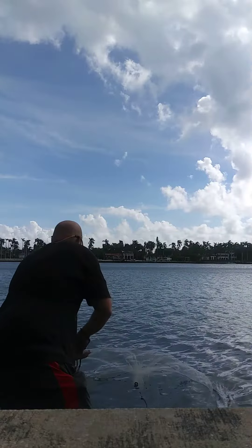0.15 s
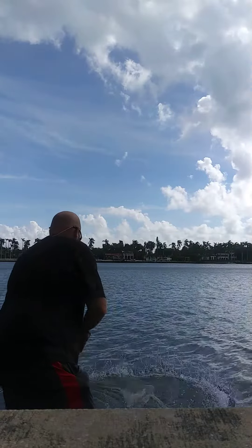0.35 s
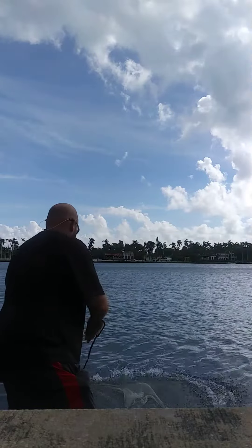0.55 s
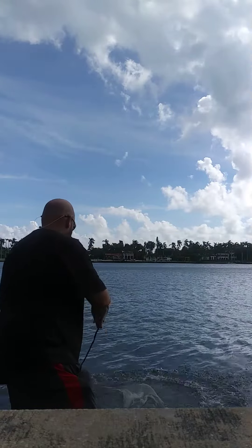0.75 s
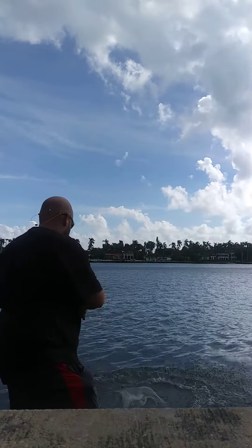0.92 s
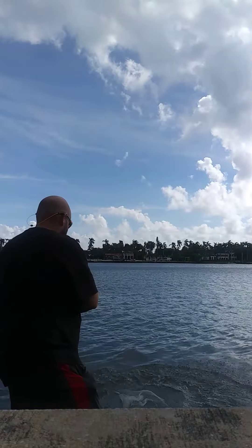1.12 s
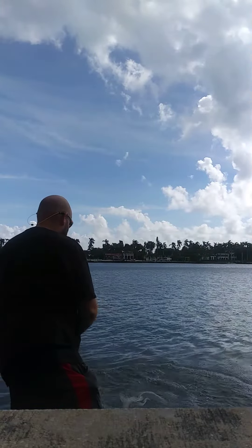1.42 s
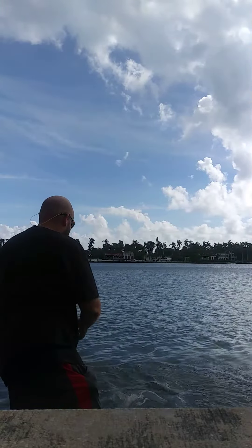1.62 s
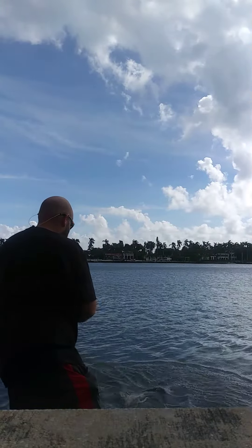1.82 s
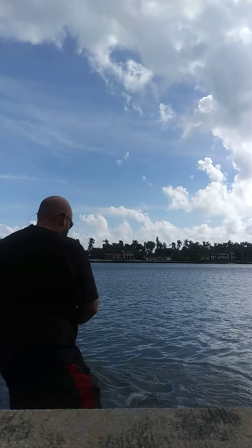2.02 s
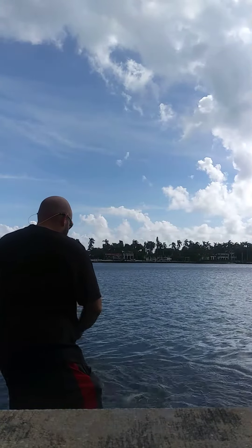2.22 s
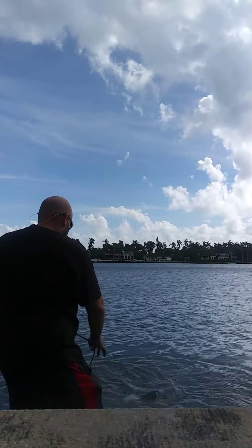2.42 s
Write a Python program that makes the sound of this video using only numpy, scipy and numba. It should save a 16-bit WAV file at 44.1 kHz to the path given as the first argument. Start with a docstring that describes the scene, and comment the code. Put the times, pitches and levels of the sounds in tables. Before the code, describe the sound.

Big splash of a weighted net hitting open water, with hollow gulps, then fizzing and lone drips

```python
"""Cast net on a lake

A weighted cast net lands on a lake a few metres from a phone on a concrete wall.
The weights smack the surface (short bursts of bright hiss), trapped air pockets ring low (gliding, dying sines),
and thrown spray rains back (a shower of tiny bubbles over noise), thinning to fizz with lone drops.
Behind it: wind and water rumble (shaped noise), a faint motor whine (steady sines) and soft low tones.
"""
import sys
import numpy as np
from scipy import signal
from scipy.fft import rfft, irfft
from scipy.io import wavfile
from scipy.ndimage import uniform_filter1d
from numba import njit

SR = 44100
rng = np.random.default_rng(int(sys.argv[2]) if len(sys.argv) > 2 else 0)


def to_wav(sig):
    """Store sig (one row per channel, or 1-D mono) as 16-bit WAV at the path in sys.argv[1].

    Samples outside -1..1 are clipped; the rate is SR.
    """
    pcm = np.clip(np.atleast_2d(sig), -1, 1) * 32767
    pcm = np.round(pcm).astype(np.int16)
    wavfile.write(sys.argv[1], SR, pcm.T)  # frames by channels


def undo_db(level):
    """Turn decibels back into plain size, where 20 dB means ten times bigger."""
    steps = np.asarray(level, float) / 20
    return 10 ** steps


N = 112454  # length in samples
RISE_PER_CYCLE = 0.0092  # a bubble near the surface glides up by this share of its pitch each cycle


def unit(x):
    """Scale to an rms of 1."""
    return x / np.sqrt(np.mean(x ** 2))


def colour(x, table):
    """Flatten the broad spectrum of x, give it the shape of (Hz, dB) points, and scale to an rms of 1."""
    hz, db = np.array(table).T
    freqs = np.fft.rfftfreq(N, 1 / SR) + 1
    spectrum = rfft(x)
    flat = spectrum / np.sqrt(uniform_filter1d(abs(spectrum) ** 2, size=1500))
    shape_db = np.interp(np.log(freqs), np.log(hz), db, left=-90, right=-90)
    return unit(irfft(flat * undo_db(shape_db), N))


def curve(table):
    """Gain over time from (s, dB) points; silent before the first, sinking by 20 dB after the last."""
    t, db = np.array(table).T
    times = np.r_[t[0] - .02, t, t[-1] + .4]
    levels = np.r_[-90, db, db[-1] - 20]
    return undo_db(np.interp(np.arange(N) / SR, times, levels))


def walk(rate):
    """A smooth random wander: random values held for 1 / rate seconds, then smoothed twice."""
    hold = int(SR / rate)
    steps = np.repeat(rng.standard_normal(N // hold + 1), hold)
    smooth = uniform_filter1d(uniform_filter1d(steps, hold), hold)
    return 1.56 * smooth[:N]  # brings the spread back to about 1


@njit
def bubbles(start_s, hz, cycles, gain, rise, n):
    """Each bubble swells quickly, dies away at a pace set by `cycles` and glides up in pitch."""
    out = np.zeros(n)
    for k in range(len(start_s)):
        first = int(start_s[k] * SR)
        step = hz[k] / SR  # cycles per sample
        phase = 0.
        for j in range(min(int(6 * cycles[k] / step), n - first)):
            c = j * step
            phase += 2 * np.pi * min(step * (1 + rise * c), .45)
            swell = 1 - np.exp(-3 * c / cycles[k])
            decay = np.exp(-c / cycles[k])
            # 2.1 lifts the top of swell * decay to about 1
            out[first + j] += gain[k] * swell * decay * 2.1 * np.sin(phase)
    return out


def swarm(per_s, lo_hz, hi_hz, cycles, spread_db):
    """A random shower of bubbles; a few are much louder than the rest."""
    when, pitch, ring, loudness = rng.random((int(per_s * N / SR), 4)).T
    hz = lo_hz * (hi_hz / lo_hz) ** pitch
    gain = undo_db(-spread_db * np.log(1 - loudness))
    return bubbles(when * N / SR, hz, cycles * (.5 + ring), gain, RISE_PER_CYCLE, N)


# spectrum of the rumble of wind and water: (frequency [Hz], relative level per Hz [dB])
LAKE_SPECTRUM = [(15, -69), (25, -49), (36, -23.5), (59, -12.5), (117, -1), (190, -2.5), (263, -0.5),
                 (293, -3), (317, -6), (451, -6.5), (624, -13.5), (1260, -18.5), (2610, -30), (4250, -32.5),
                 (7110, -34.5), (12200, -56), (16000, -51)]
# gusts over the water: (time [s], level [dB])
GUST_LEVEL = [(0, 1), (.4, -0.5), (.95, 0), (1.1, 0), (1.4, 0), (1.52, 0), (1.62, 0), (1.75, 0), (1.9, 0),
              (2.05, -0.5), (2.15, 0.5), (2.3, 1), (2.55, 0.5)]


def lake():
    """Wind and water: octave bands of noise follow the gusts and flicker separately, the bass most."""
    spectrum = rfft(colour(rng.standard_normal(N), LAKE_SPECTRUM))
    octave = np.log2(np.fft.rfftfreq(N, 1 / SR) + 1)
    swell_db = np.interp(np.arange(N) / SR, *np.array(GUST_LEVEL).T)
    out = 0
    for k in np.arange(4, 15.):  # band centres at 2 ** k Hz
        band = irfft(spectrum * np.clip(1 - abs(octave - k), 0, 1), N)
        gusty = np.clip((11.5 - k) / 4, .15, 1)
        out = out + band * undo_db(gusty * (swell_db + .8 * walk(9)))
    return unit(out) * undo_db(-36)


# steady whine of the motor: (frequency [Hz], level [dB])
MOTOR_LINES = [(872.1, -87), (1351, -64.5), (3316, -75.5), (4075, -70.5), (4134, -77), (4194, -70.5),
               (4253, -67), (4484, -72)]


def motor():
    """A distant motor: thin lines of fixed pitch that waver slightly in level."""
    t = np.arange(N) / SR
    out = 0
    for hz, db in MOTOR_LINES:
        wavering = np.sqrt(2) * undo_db(db + 0.5 * walk(5.1))
        out = out + wavering * np.sin(2 * np.pi * (hz * t + rng.random()))
    return out


# faint low tones that come and go: (start [s], length [s], frequency [Hz], level [dB])
LOW_TONES = [(0.05, 0.17, 404, -43.5), (0.406, 0.2, 316.3, -36), (1.001, 0.12, 268, -44.5),
             (1.43, 0.14, 267, -41), (2.08, 0.12, 262, -46.5)]


def tones():
    """Soft notes: sines of fixed pitch that swell and fade."""
    t = np.arange(N) / SR
    out = 0
    for start, length, hz, db in LOW_TONES:
        swell = np.sin(np.pi * np.clip((t - start) / length, 0, 1)) ** .5
        out = out + np.sqrt(2) * undo_db(db) * swell * np.sin(2 * np.pi * hz * t)
    return out


# lone drops, before dulling: (time [s], peak level [dB], frequency [Hz], ring [cycles])
LONE_DROPS = [(.516, -35, 9500, 4.8), (.568, -44, 11000, 2), (.618, -38, 5170, 8), (.837, -44, 10500, 3),
              (.857, -38, 4500, 3), (.900, -46, 9500, 2), (.932, -41, 7800, 3), (1.028, -44, 7500, 2),
              (1.158, -47, 4300, 3), (1.1766, -36, 8000, 2), (1.200, -48, 8250, 3), (1.3455, -31, 2200, .6),
              (1.358, -45, 13500, 4), (1.761, -50, 9700, 3), (1.789, -54, 8050, 6),
              (1.800, -55, 10500, 3.7), (1.826, -47, 9800, 2.5), (1.8615, -38, 8900, 1.2),
              (1.916, -51, 10200, 2.7), (2.410, -41, 6250, 4.3)]


def drops():
    """Ticks of single drops, and a thin patter of tiny ones dripping from rope and hands, ring as bubbles."""
    s, db, hz, cycles = np.array(LONE_DROPS, float).T
    ticks = bubbles(s, hz, cycles, undo_db(db), RISE_PER_CYCLE, N)
    patter = undo_db(-66) * swarm(60, 4000., 11000., cycles=3.0, spread_db=2.5)
    patter = patter * (np.arange(N) > .4 * SR)  # starts at 0.4 s
    dull = signal.butter(2, 10500., fs=SR, output="sos")
    return signal.sosfilt(dull, ticks + patter)


# large air pockets: (time [s], peak level [dB], frequency [Hz], ring [cycles])
AIR_POCKETS = [(.214, -29.5, 764, 5.6), (.253, -22, 663, 2.9), (.261, -12.5, 424, 3),
               (.277, -13.5, 529, 2.6), (.286, -12.5, 430, 2.35), (0.297, -18, 1040, 1),
               (.302, -13.5, 307, 1.35), (0.31, -10.5, 438, 1.8), (.318, -16, 683, 4),
               (0.32, -16.5, 279, 2), (.333, -11, 455, 1.56), (0.345, -16, 382, 1.7),
               (0.355, -16, 388, 2.2), (.371, -17, 572, 2.8), (.423, -28.5, 346, 3.4),
               (.455, -31.5, 556, 4.3), (.623, -19, 730, 1.95), (.624, -23, 930, 2),
               (0.776, -30.5, 253, 1.9)]
# spectrum of the churning small pockets: (frequency [Hz], relative level per Hz [dB])
CHURN_SPECTRUM = [(150, -2), (250, -9.5), (400, 0.5), (700, -2.5), (1100, -7), (1250, -18.5), (1500, -34)]
# loudness of the churn: (time [s], level [dB])
CHURN_OVER_TIME = [(.18, -42), (.245, -31), (.27, -24.5), (.32, -21.5), (.36, -28), (.42, -35.5),
                   (.5, -32.5), (.64, -32.5), (.7, -36.5), (.9, -44), (1.0, -67)]


def pockets():
    """The weights drag air under: a few large pockets ring over a churn of small ones and rushing water."""
    s, db, hz, cycles = np.array(AIR_POCKETS, float).T
    large = bubbles(s, hz, cycles, undo_db(db), RISE_PER_CYCLE, N)
    small = unit(swarm(900, 207.7, 1464.0, cycles=4.34, spread_db=1.5))
    rushing = undo_db(3.5) * rng.standard_normal(N)
    return large + colour(small + rushing, CHURN_SPECTRUM) * curve(CHURN_OVER_TIME)


def droplets():
    """Thousands of tiny bubbles a second fizz over a hiss: the raw stuff of spray and smacks."""
    fizz = unit(swarm(6000, 1200., 15000., cycles=2.5, spread_db=2.1))
    return fizz + undo_db(-2) * rng.standard_normal(N)


# spectrum of the falling spray: (frequency [Hz], relative level per Hz [dB])
SPRAY_SPECTRUM = [(1000, -33), (1350, -5.5), (1600, 1.5), (1900, 4.5), (2530, -3.5), (2800, -0.5),
                  (4100, -6), (5100, -4.5), (6400, -6), (7400, -8.5), (10100, -19), (12900, -33),
                  (14800, -33), (15700, -30)]
# spray falling on the water: (time [s], level [dB])
SPRAY_OVER_TIME = [(.152, -43), (.158, -44.5), (.22, -39.5), (.265, -33.5), (.30, -28), (.335, -33),
                   (.35, -34.5), (.42, -38.5), (.51, -37.5), (.66, -35), (.72, -40), (.87, -44.5),
                   (.94, -50), (1.2, -53), (1.6, -59.5)]


def spray(grains):
    """Thrown water rains back: the droplets follow the loudness curve and flicker quickly."""
    flicker = undo_db(0.43 * walk(59.9))
    return colour(grains, SPRAY_SPECTRUM) * curve(SPRAY_OVER_TIME) * flicker


# weights smacking the surface: (time [s], peak level [dB], time to decay by 60 dB [s])
WEIGHT_SMACKS = [(.157, -29.5, .3), (0.1713, -23.5, 0.17), (.1935, -21, 0.072), (0.2027, -15.5, 0.11),
                 (.2486, -21, 0.068), (.2733, -18.5, 0.065), (0.3023, -15, 0.1), (0.312, -13, 0.085),
                 (.322, -20, 0.064), (0.332, -12, 0.051), (0.4815, -25, 0.084), (.649, -33, .1)]
# spectrum of the smacks: (frequency [Hz], relative level per Hz [dB])
SMACK_SPECTRUM = [(1000, -28), (1500, -4), (2100, 0), (3100, 3), (4800, -1.5), (7400, -2), (10500, -16.5),
                  (13000, -27), (15000, -29), (15700, -26)]


def smacks(grains):
    """Each weight that hits throws a sudden brighter burst of droplets, which then dies away."""
    crest_db = 11  # the listed peak stands this far over the hiss of the burst
    t = np.arange(N) / SR
    power = 0
    for s, db, t60 in WEIGHT_SMACKS:
        attack = np.clip((t - s) / 0.00095, 0, 1)  # about 1 ms
        fall_db = 60 * np.clip(t - s, 0, 1) / t60
        power = power + attack * undo_db(db - crest_db - fall_db) ** 2
    # half a turn in time, so that these grains differ from the spray's at each moment
    return colour(np.roll(grains, N // 2), SMACK_SPECTRUM) * np.sqrt(power)


def scene():
    """All sources at the phone, in one channel."""
    grains = droplets()
    background = lake() + motor() + tones()
    splash = drops() + pockets() + spray(grains) + smacks(grains)
    return (background + splash)[None]


def band_limit(x):
    """A steep low-pass at the top of the band."""
    return signal.sosfilt(signal.butter(12, 17070, fs=SR, output="sos"), x)


def record(dry):
    """The phone rounds the peaks softly, then cuts the deep bass and the top."""
    rounded = np.tanh(1.465 * dry) / 1.53
    bass_cut = signal.butter(4, 42, "high", fs=SR, output="sos")
    top_cut = signal.ellip(10, .2, 50, 15720, fs=SR, output="sos")
    mix = signal.sosfilt(np.r_[bass_cut, top_cut], rounded)
    return band_limit(mix)


dry = scene()
out = record(dry)
to_wav(out)
```